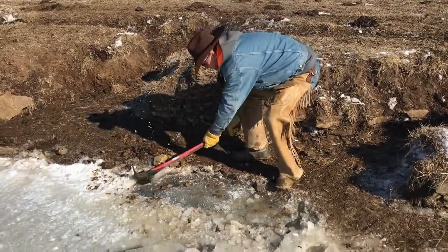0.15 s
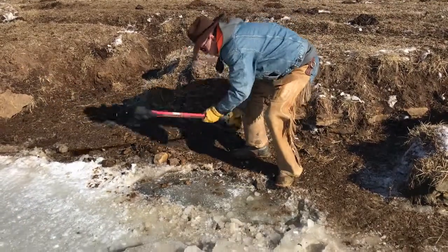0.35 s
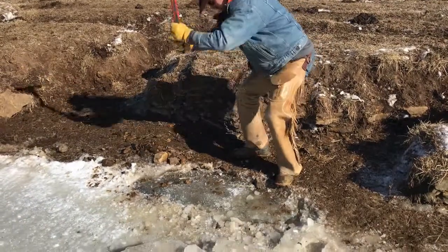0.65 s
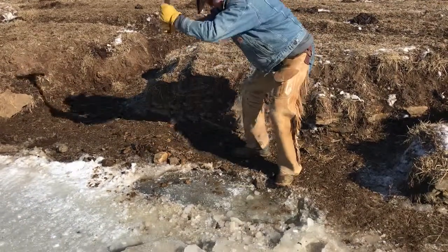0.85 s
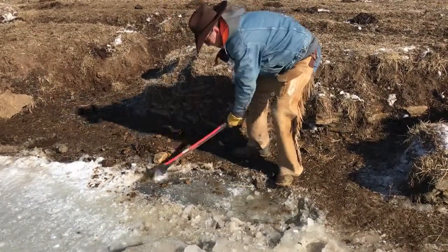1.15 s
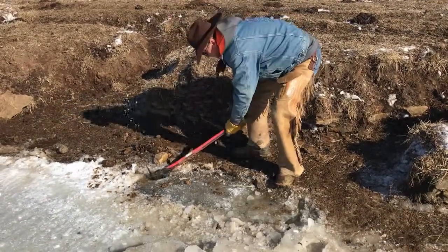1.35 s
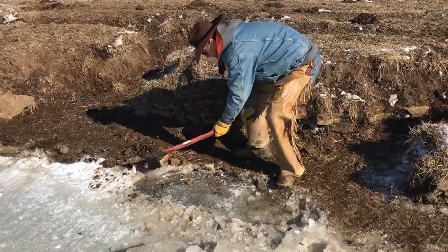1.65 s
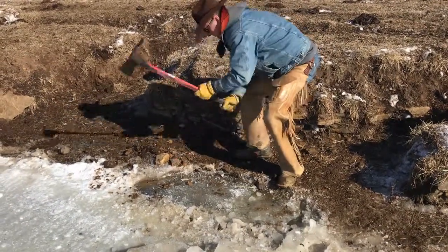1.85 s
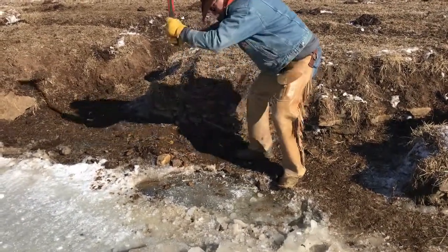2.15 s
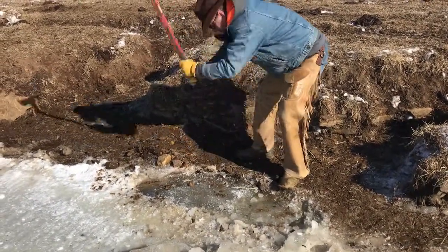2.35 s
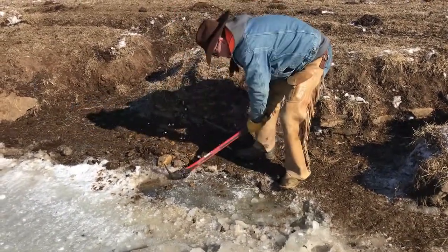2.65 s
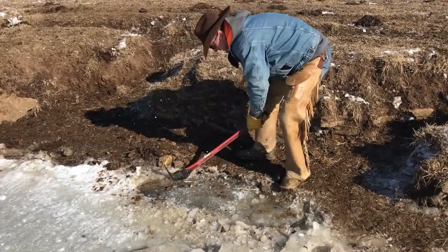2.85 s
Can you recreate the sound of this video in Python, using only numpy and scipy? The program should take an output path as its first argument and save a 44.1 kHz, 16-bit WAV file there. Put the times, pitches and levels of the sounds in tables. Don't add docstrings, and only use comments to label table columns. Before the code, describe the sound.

An axe strikes pond ice in three sharp, dry cracks about 1.35 seconds apart, each with a brief dull ring; ice chips tick down between blows, faint slush crackles, and wind buffets the close outdoor microphone.

```python
import sys
import numpy as np
from scipy import signal
from scipy.fft import rfft, irfft, next_fast_len
from scipy.io import wavfile
from scipy.ndimage import map_coordinates

SR = 44100
rng = np.random.default_rng(int(sys.argv[2]) if len(sys.argv) > 2 else 0)


def to_wav(sig):
    pcm = np.clip(np.atleast_2d(sig), -1, 1) * 32767
    pcm = np.round(pcm).astype(np.int16)
    wavfile.write(sys.argv[1], SR, pcm.T)


def ratio(d):
    e = np.asarray(d, float) / 20
    return 10 ** e


N = 132300


def unit(x):
    return x / np.sqrt(np.mean(x ** 2) + 1e-20)


def along(points, hz):
    f, v = np.transpose(points)
    return np.interp(np.log(hz + 1), np.log(f + 1), v)


def wobble(knots_per_s):
    return map_coordinates(rng.standard_normal(400), [np.arange(N) * knots_per_s / SR])


def filtered(x, response):
    m = next_fast_len(len(x) + 8192)
    gain = response(np.fft.rfftfreq(m, 1 / SR))
    return irfft(rfft(x, m) * gain, m)[:len(x)]


def noise(spectrum):
    return unit(filtered(rng.standard_normal(N), lambda hz: ratio(along(spectrum, hz))))


def wavelets(middle_s, hz, db, cycles, phase, half_size):
    k = np.arange(-half_size, half_size)
    t = k / SR
    pitch = hz[:, None]
    bell = np.exp(-(t * pitch / cycles) ** 2 * 2)
    wave = ratio(db)[:, None] * bell * np.sin(2 * np.pi * pitch * t + phase[:, None])
    at = np.round(middle_s * SR).astype(int)[:, None] + k
    return np.bincount(np.clip(at + 1, 0, N + 1).ravel(), wave.ravel(), N + 2)[1:N + 1]


def add(track, start_s, sound):
    part = track[max(round(start_s * SR), 0):][:len(sound)]
    part += sound[:len(part)]


# pitch_hz, level_db (per Hz)
CRACK = [(410, -21), (700, -14.5), (1090, -6), (2270, -11.5), (3500, -10), (8530, -24), (10400, -22.5),
         (14800, -22), (16000, -26)]


def burst(t60s):
    raw = filtered(rng.standard_normal(SR // 4), lambda hz: ratio(along(CRACK, hz)))
    hz, t, z = signal.stft(unit(raw) / 2, SR, nperseg=64)
    decay = ratio(-60 * t / along(t60s, hz)[:, None])
    return signal.istft(z * decay, SR, nperseg=64)[1][:SR // 4]


# pitch_hz, level_db, t60_s
ICE = [(632, 11, 0.034), (1046, 9.5, 0.048), (1930, -18, 0.034), (3560, -8, 0.059), (4210, -40, 0.042),
       (5060, -18, 0.027), (5389, -43, 0.08), (5650, -9, 0.033), (6900, -17, 0.069), (8000, -40, 0.029)]


def ice_ring(t):
    ring = np.zeros(len(t))
    for hz, level_db, t60 in ICE:
        decay = ratio(level_db + rng.normal(0, 3.3) - 60 * t / t60)
        ring += decay * np.sin(2 * np.pi * hz * t + rng.uniform(0, 5.7))
    return ring * (1 - np.exp(-t / 0.0029))


def ice_shards(t):
    spiky = ratio(4.1 * rng.standard_normal(len(t) // 100 + 1).repeat(100)[:len(t)])
    return spiky * burst([(700, 0.16)])


# start_s, peak_db, ring_db, shards_db (ring and shards relative to the crack)
BLOWS = [
    (0.0005, -9.5, -17, -33),
    (1.3519, -1, -17.5, -34),
    (2.7105, -4, -18, -39.5),
]
# pitch_hz, t60_s
CRACK_T60 = [(700, 0.058), (3000, 0.032), (8000, 0.04), (15000, 0.03)]


def axe():
    out, t = np.zeros(N), np.arange(SR // 4) / SR
    touch_db, touch_lead_s = -46, 0.022
    for s, db, ring_db, shards_db in BLOWS:
        ring = ratio(ring_db) * ice_ring(t)
        shards = ratio(shards_db) * ice_shards(t)
        crack = burst(CRACK_T60) * (1 - np.exp(-t / 0.0005))
        add(out, s, ratio(db) * (crack + ring + shards))
        touch = ratio(db + touch_db) * burst([(700, 0.015)])
        if s > touch_lead_s:
            add(out, s - touch_lead_s, touch)
    return out


# start_s, peak_db, centre_hz, t60_s
CHIPS = [(0.058, -31, 4760, 0.012), (0.069, -47, 3120, 0.012), (0.197, -19.5, 3400, 0.012),
         (0.2466, -31, 11900, 0.012), (0.2693, -31.5, 11800, 0.012), (0.349, -47, 3510, 0.012),
         (0.416, -18.5, 13100, 0.012), (0.435, -34, 4360, 0.012), (0.4665, -32, 4220, 0.012),
         (0.5137, -43, 3120, 0.012), (0.606, -42, 2920, 0.012), (0.6245, -26.5, 8310, 0.012),
         (0.6303, -17, 9580, 0.012), (0.7382, -51, 3340, 0.012), (0.7706, -45, 2560, 0.012),
         (0.8969, -36, 2500, 0.012), (1.4024, -45, 3150, 0.012), (1.5494, -32, 6270, 0.012),
         (1.627, -34, 3820, 0.012), (1.7868, -50, 2580, 0.012), (1.8103, -48, 2810, 0.012),
         (1.8672, -30, 3180, 0.012), (1.891, -33.5, 2720, 0.012), (1.914, -41, 2550, 0.012),
         (1.948, -22.5, 2860, 0.012), (2.043, -35, 2510, 0.012), (2.1849, -25, 5470, 0.012),
         (2.829, -36, 2580, 0.012), (2.94, -30, 3090, 0.012), (2.957, -29, 3580, 0.012)]


def chips():
    out, t = np.zeros(N), np.arange(2048) / SR
    ring_db, width = -12.5, 0.54
    for s, db, hz, t60 in CHIPS:
        raw = rng.standard_normal(len(t))
        tick = unit(filtered(raw, lambda f: np.exp(-(np.log((f + 1) / hz) / width) ** 2 / 2)))
        ring = ratio(ring_db) * np.sin(2 * np.pi * hz * t)
        envelope = ratio(db - 10.5 - 60 * t / t60) * (1 - np.exp(-t / 0.00024))
        add(out, s, envelope * (0.67 * tick + ring))
    return out


# middle_s, half_length_s, level_db, centre_hz
SLUSH = [(0.041, 0.024, -55, 2520), (0.128, 0.031, -59, 2220), (.2, 0.023, -50.5, 2860),
         (0.377, 0.036, -51.5, 2850), (0.849, .07, -65, 4030), (1.471, 0.045, -63, 1430),
         (1.551, 0.011, -61, 1520), (1.586, .016, -46, 1390), (1.618, 0.048, -61, 3350),
         (1.81, 0.069, -58.5, 3000), (1.953, 0.0083, -47, 2600), (2.089, 0.038, -61.5, 1900),
         (2.79, 0.044, -65.5, 2460), (2.94, 0.021, -45.5, 1950), (2.999, 0.011, -43.5, 2530)]


def slush():
    out, time = np.zeros(N), np.arange(N) / SR
    crackles_per_s, pitch_spread, cycles = 1500, 0.45, 3.75
    sizes_db, fizz_db = -0.5, -4.5
    fizz_colour = [(800, -35.5), (2500, 4), (6000, 0.5), (16000, -2.5)]  # pitch_hz, level_db
    fizz = noise(fizz_colour) * ratio(4.7 * wobble(120))
    for s, half, db, hz in SLUSH:
        count = round(crackles_per_s * 2 * half) + 4
        when, tune, size, turn = rng.standard_normal((250, 4))[:count].T
        pitch = np.clip(hz * np.exp(pitch_spread * tune), 500, 15000)
        level_db = db + sizes_db * np.abs(size)
        out += wavelets(s + half * 0.57 * when, pitch, level_db, cycles, 4 * turn, half_size=300)
        swell = np.exp(-((time - s) / half) ** 2)
        out += ratio(db + fizz_db) * swell * fizz
    return out


# start_s, peak_db, fall_db (per octave above 500 Hz)
EDDIES_EARLY = [(0.149, -25, 12.5), (0.314, -33.5, 19), (0.397, -33, 5), (0.398, -23.5, 5.5),
                (0.452, -18, 30), (0.533, -23.5, 20.5), (0.594, -24.5, 17), (0.654, -14, 13.5),
                (0.69, -24.5, 15.5), (0.721, -18.5, 17), (0.733, -23.5, 23), (0.774, -16.5, 20),
                (0.847, -15.5, 25), (0.88, -17.5, 16), (0.969, -20, 21), (1.005, -26.5, 13),
                (1.049, -24, 17), (1.109, -10, 9.5), (1.24, -23, 15.5), (1.342, -20.5, 17)]
EDDIES_MID = [(1.407, -18.5, 13.3), (1.43, -15.5, 13.3), (1.518, -22.5, 11.6), (1.577, -32, 11),
              (1.612, -31, 12), (1.628, -17.5, 10), (1.687, -12, 14.5), (1.706, -12, 10.4),
              (1.768, -37.5, 13), (1.799, -16, 8.8), (1.838, -19, 29), (1.879, -19, 30), (1.9, -23, 9.6),
              (1.923, -11, 11.5), (1.985, -19, 14), (2.035, -11, 18.5), (2.066, -12, 18),
              (2.105, -27.5, 19), (2.139, -14.5, 29.5)]
EDDIES_LATE = [(2.145, -22.5, 9.6), (2.192, -22, 15.5), (2.234, -29, 16), (2.251, -13.5, 17),
               (2.272, -27.5, 12.4), (2.311, -32, 14), (2.335, -19.5, 15), (2.359, -21, 15.4),
               (2.378, -17.5, 17), (2.42, -18, 17.5), (2.445, -9, 12), (2.483, -9.5, 15.5),
               (2.55, -19.5, 12.2), (2.584, -38, 17), (2.595, -24, 19.4), (2.708, -18.5, 16),
               (2.71, -16.5, 7.4), (2.751, -21, 16.5), (2.853, -25.5, 13), (2.923, -20.5, 14)]


def eddies():
    s, db, fall_db = np.transpose([*EDDIES_EARLY, *EDDIES_MID, *EDDIES_LATE])[:, :, None]
    cycles, spread_s, lag_s = 1.045, 0.004, 0.002973
    swing_db_per_octave, eddy_db = 0.5, -5
    octave = np.arange(-6, 6) / 2
    chance = rng.standard_normal((len(s), 4, len(octave)))
    hz = 500 * 2 ** (octave + 0.15 * chance[:, 0])
    at = s + lag_s * 500 / hz + spread_s * (1 + chance[:, 1])
    slope_db = np.where(octave > 0, fall_db, swing_db_per_octave)
    level_db = db - slope_db * octave + eddy_db + 2.85 * chance[:, 2]
    phase = 4 * chance[:, 3]
    return wavelets(at.ravel(), hz.ravel(), level_db.ravel(), cycles, phase.ravel(), half_size=1300)


# time_s, level_db
WIND = [
    (0.0, -31.5),
    (0.1, -29),
    (2.42, -23.5),
    (2.43, -21.5),
    (3.0, -22.5),
]
# pitch_hz, level_db (per Hz)
RUMBLE = [(12, -41), (20, 0.5), (75, 5.5), (270, -12), (325, -14.5), (542, -28.5), (594, -28.5), (874, -36),
          (1600, -58.5), (2080, -92), (3520, -120)]
# pitch_hz, level_db (per Hz)
FLUTTER = [(100, -17), (220, 2), (500, -16.5), (1000, -22), (2000, -52)]


def wind():
    s, db = np.transpose(WIND)
    strength_db = np.interp(np.arange(N) / SR, s, db)
    rumble = ratio(0.5) * unit(noise(RUMBLE) * ratio(5 * wobble(12)))
    flutter = ratio(-16.5) * unit(noise(FLUTTER) * ratio(12 * wobble(45)))
    return ratio(strength_db) * (rumble + flutter)


# pitch_hz, level_db (per Hz)
HISS = [(880, -13), (1500, -18.5), (3380, -9.5), (4500, -15), (5020, -13.5), (8320, -15.5), (16000, -15)]


def hiss():
    return ratio(-66.5 + 1.2 * wobble(4.5)) * noise(HISS)


def scene():
    background = hiss() + wind() + eddies()
    return (background + axe() + chips() + slush())[None]


def top_cut(x):
    return signal.sosfilt(signal.butter(12, 16620, fs=SR, output="sos"), x)


def record(dry):
    mix = filtered(dry[0], lambda hz: (hz < 15900) * hz ** 4 / (hz ** 4 + 32 ** 4))
    return top_cut(mix[None])


dry = scene()
out = record(dry)
to_wav(out)
```